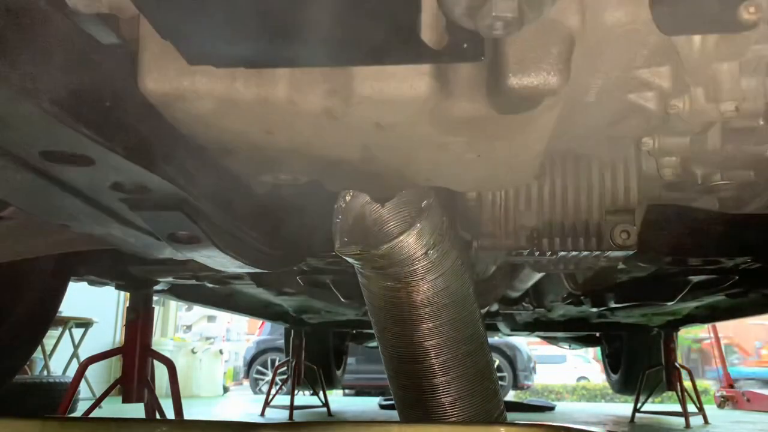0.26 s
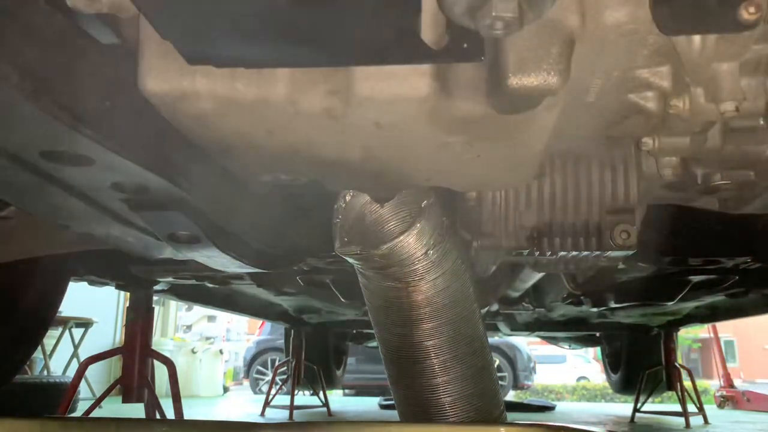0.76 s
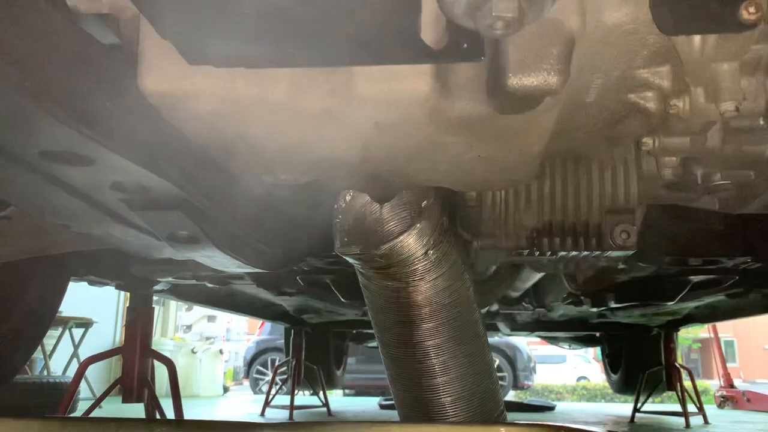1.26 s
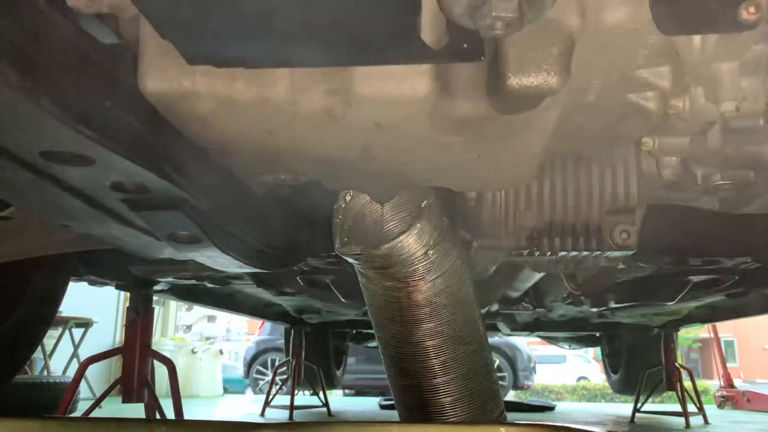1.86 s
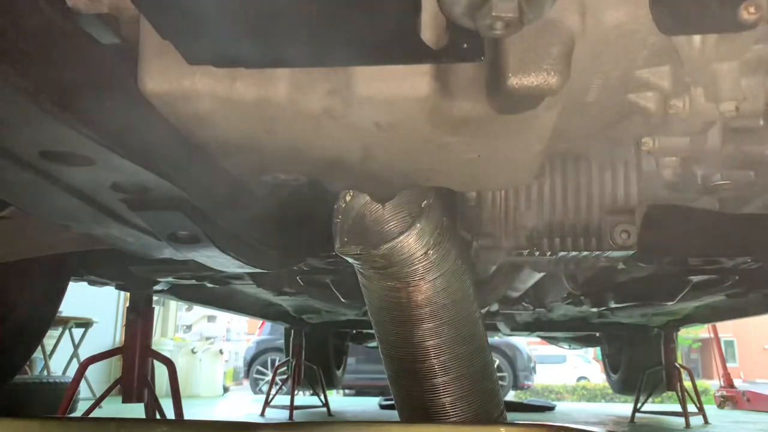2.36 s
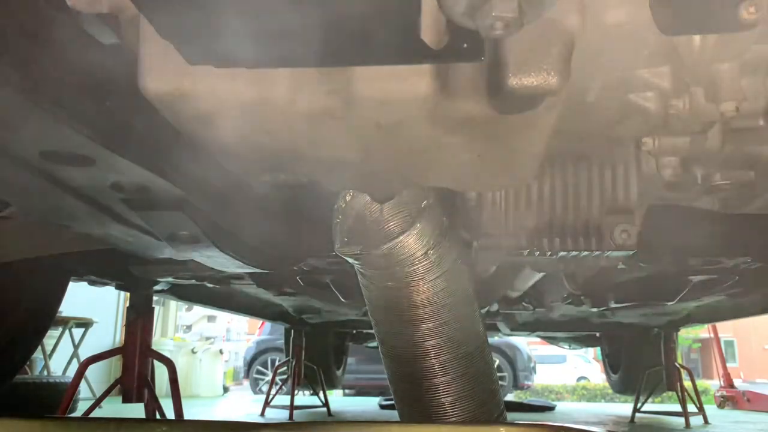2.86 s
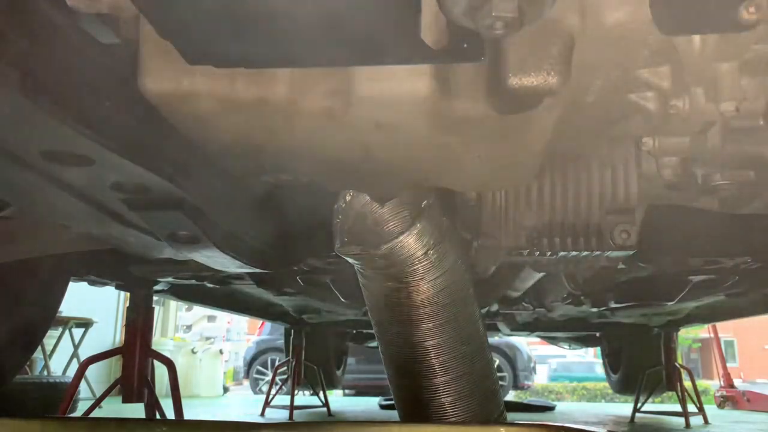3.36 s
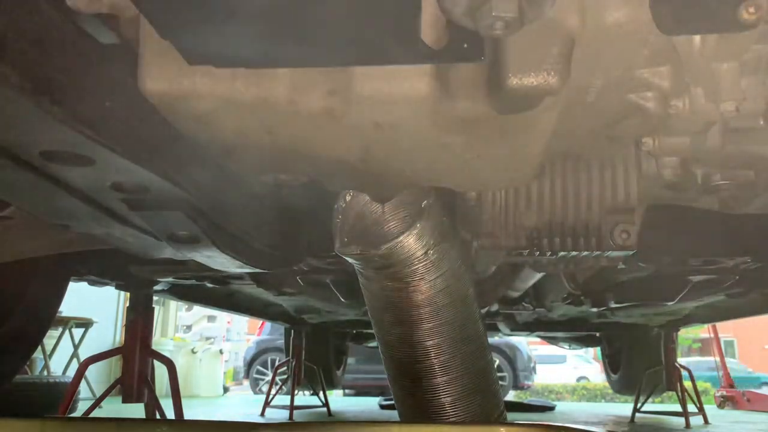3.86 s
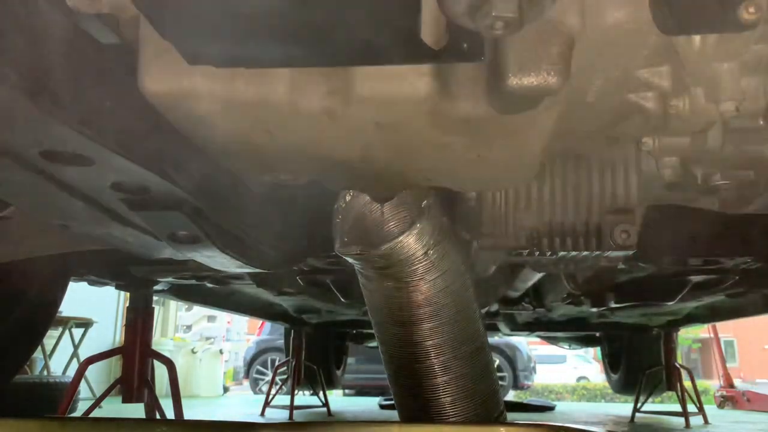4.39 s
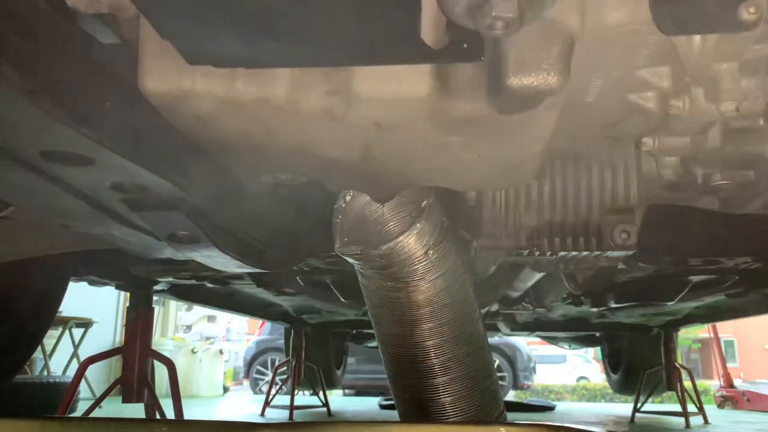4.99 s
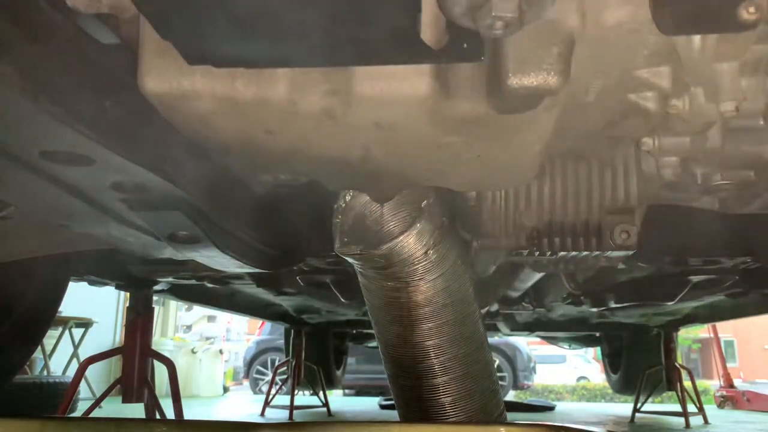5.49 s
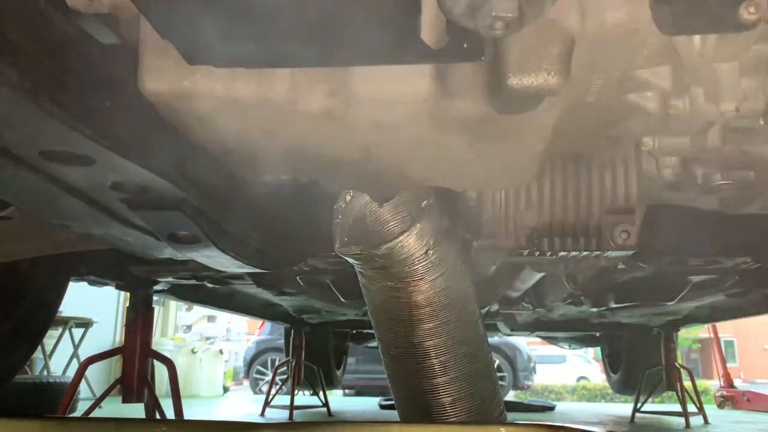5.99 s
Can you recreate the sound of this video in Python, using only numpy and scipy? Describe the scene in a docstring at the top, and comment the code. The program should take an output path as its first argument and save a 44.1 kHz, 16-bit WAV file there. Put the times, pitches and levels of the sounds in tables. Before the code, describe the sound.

Close under a raised car in a workshop, a spray jet hisses without a break, bright and slightly gritty. Its noise rings hollowly between floor and metal underbody. An extraction hose roars softly below, a touch louder at first, then even. A passing car's tyre noise quickly fades in the opening second or two, with faint low drones until about three seconds. Wide stereo phone pickup.

```python
"""On the floor beneath a raised car: a spray jet hisses steadily and an extraction hose roars, close to a phone.
The hollow between floor and underbody rings at many narrow resonances, unequal at the two microphone ports.
From the street come a fading rumble, a car drawing away and faint bass drones.
Noise sources are coloured as spectra and swell by slow random levels; the drones are gliding sines."""
import sys
import numpy as np
from scipy import signal
from scipy.fft import rfft, irfft
from scipy.io import wavfile
from scipy.ndimage import uniform_filter1d

SR = 44100
rng = np.random.default_rng(int(sys.argv[2]) if len(sys.argv) > 2 else 0)


def bounce(signal):
    """Save signal as a 16-bit WAV file at the path given by the first command-line argument."""
    frames = np.transpose(np.atleast_2d(signal))
    limited = np.clip(frames, -1, 1)
    pcm = np.round(limited * 32767).astype(np.int16)
    wavfile.write(sys.argv[1], SR, pcm)


N = 275184  # samples
HZ = np.arange(N // 2 + 1) * SR / N  # frequency of each spectrum bin

# Street rumble, relative colour: f/Hz, level/dB per Hz
STREET_COLOUR = [(15, -47), (25, -30), (40, -2.5), (65, -5), (100, 2.5), (140, 1.5), (160, -3), (175, -10),
                 (230, -50)]
# Extraction hose, relative colour: f/Hz, level/dB per Hz
HOSE_COLOUR = [(60, -58), (150, -28), (174, -14), (186, -2.5), (220, -1), (243, 2), (270, -1.5), (300, -7),
               (345, -7.5), (420, -10), (480, -18), (620, -17.5), (720, -26), (900, -88), (1500, -75)]
# Unshared part of the bass at the two ports: f/Hz, level/dB relative to the shared part
BASS_SIDE = [(30, -29), (100, -17.5), (250, -20), (500, -10.5), (900, 3)]
# Tyres of a car drawing away, relative colour: f/Hz, level/dB per Hz
TYRE_COLOUR = [(300, -14), (600, -4), (900, -5), (1300, -3), (2500, -24), (6000, -50)]
# Sound scattered about the hollow, unrelated at the two ports: f/Hz, relative level/dB per Hz
HOLLOW_SCATTER = [(450, -32), (600, -20.5), (820, -23.5), (1050, -21), (1500, -21.5), (2300, -15.5),
                  (2680, -14), (2810, -24), (2960, -14), (3130, -26), (3380, -25), (3550, -18),
                  (4200, -14.8), (5400, -12.9), (6100, -15), (7000, -13), (8000, -15), (9000, -26),
                  (11000, -45)]
# Resonances of the hollow, led by two rings of the hose near 570 and 642 Hz: f/Hz, full width at half
# amplitude/Hz, relative level/dB, left minus right/dB, phase lead of right/rad
HOLLOW_MODES = [(570, 40, -4, 4.5, -.8), (642, 80, -4.5, -.4, .1), (843, 241, -19.5, 1.3, -3),
                (980, 38, -3, -6.7, -.2), (1006, 36, -7, -6, -.2), (1157, 213, -15.9, 0, -.3),
                (1288, 60, -13, 9.4, -2.2), (1388, 65, -5.2, -2.7, 2), (1541, 47, -17.2, 12, .3),
                (1637, 106, -12.6, 1.8, -.1), (1744, 150, -7.6, -1.8, -1.4), (1905, 120, -7.6, .6, -.6),
                (2086, 74, -11.9, 1.9, -3.1), (2190, 60, -13, -1.5, -.2), (2317, 72, -13.3, 5.3, -2.6),
                (2461, 215, -11.3, .8, -1.6), (2590, 150, -4.2, 1.9, 0), (2695, 110, -5, -2.5, -.5),
                (2942, 95, -4.8, -2.6, -1.5), (3035, 75, -8, .9, -.9), (3319, 249, -15, -.8, -3.1),
                (3583, 140, -8.8, -1.7, -2.4), (3698, 178, -11.3, 2.1, -2.2), (4110, 380, -10, -3.4, -1.8),
                (4570, 300, -8.5, -7.2, -2), (4823, 76, -12.1, -2.7, 3.1), (5100, 260, -9.2, -4.7, -2.1),
                (5672, 420, -8.3, -4.5, -2.7), (6400, 400, -10.5, -3.8, -1.8), (6800, 450, -9, -.5, -2.9),
                (7090, 120, -5, -.6, -2.7)]
# Spray jet before its echoes, relative colour: f/Hz, level/dB per Hz
JET_COLOUR = [(4000, -32), (6200, -18), (7100, -6), (8000, -2.5), (9000, -.1), (10000, -1.3), (11000, -4.2),
              (11700, -4.4), (12500, -5.2), (12900, -9), (13600, -8.8), (14500, -9.7), (16000, -10)]
# Jet echoes off near metal: delay/ms, gain/ratio
METAL_ECHOES = [(0.363, -0.066), (1.2, 0.064), (1.824, 0.25), (2.5, -0.028), (3.3, 0.13), (5.023, 0.044)]
# Street drones: loudest from t/s, f/Hz at that moment, level/dB before waver, swell/s, hold/s, fade/s
STREET_DRONES = [(.7, 97.5, -48, .4, 0.52, 0.32), (1.785, 140.5, -40.5, 0.26, 0.22, 0.54),
                 (2.62, 122.5, -39, .15, .05, .15), (2.8, 44.4, -39, .12, .01, 0.19)]

STREET_DB, STREET_FADE_DB_PER_S = -38.5, 0.83  # traffic draws away
HOSE_DB, HOSE_SURGE_DB, HOSE_SETTLE_S = -32, 3, 0.54  # starts louder, settles to HOSE_DB
TYRES_DB, TYRES_FADE_DB_PER_S = -45.5, 10
HOLLOW_DB, JET_DB = -30.5, -27.5  # steady levels before flutter
NULL_HZ, NULL_WIDTH_HZ, NULL_DEPTH = 2818, 75, .78  # band thinned by the floor bounce; depth 0-1
JET_LAG_MS = .2165  # the left port hears the jet later
JET_SCATTER_DB = -32  # part arriving from all sides, relative to the direct jet
JET_TIE = .65  # wide spray: how firmly its in-step and out-of-step parts hang together, 0-1
DRONE_SAG_PER_S = 0.0296  # share of the listed pitch lost each second
DRONE_RANGE_DB = 10  # rise over one swell time, fall over one fade time
TOP_HZ = 15720  # upper edge of the phone's band


def undb(db):
    """Turn decibels into an amplitude ratio."""
    return 10 ** (np.asarray(db) / 20)


def shape(points):
    """Draw a gain curve through (Hz, dB) points, straight in dB over log frequency."""
    hz, db = np.transpose(points)
    return undb(np.interp(np.log(HZ + 1), np.log(hz), db))


def white():
    """Draw a fresh white-noise spectrum."""
    return rng.standard_normal(len(HZ)) + 1j * rng.standard_normal(len(HZ))


def sound(spectra):
    """Turn left and right spectra into waves with a joint rms of 1."""
    waves = irfft(np.array(spectra), N)
    return waves / np.sqrt(np.mean(waves ** 2))


def walk(rate):
    """Wander slowly: random levels held 1 / rate s, smoothed twice, with a spread near 1."""
    hold = int(SR / rate)
    steps = rng.standard_normal(N)[np.arange(N) // hold]
    smooth = uniform_filter1d(uniform_filter1d(steps, hold), hold)
    return smooth * 4 / 3


def bass(colour, lumpy_db, lumps_per_s):
    """Long waves reach both ports nearly alike and swell unevenly."""
    shared = shape(colour) * white()
    unshared = shape(colour) * shape(BASS_SIDE) * white()
    ports = sound([shared + unshared, shared - unshared])
    return ports * undb(lumpy_db * walk(lumps_per_s))


def street_rumble(t):
    """Distant traffic is low noise that fades as it draws away."""
    level_db = STREET_DB - STREET_FADE_DB_PER_S * t
    return undb(level_db) * bass(STREET_COLOUR, lumpy_db=1.06, lumps_per_s=5)


def hose_roar(t):
    """Air drawn through the hose roars as low noise, a little louder at first."""
    level_db = HOSE_DB + HOSE_SURGE_DB * np.exp(-t / HOSE_SETTLE_S)
    return undb(level_db) * bass(HOSE_COLOUR, lumpy_db=0.64, lumps_per_s=8)


def car_tyres(t):
    """Tyre noise, unrelated at the two ports, fades quickly as the car draws away."""
    level_db = TYRES_DB - TYRES_FADE_DB_PER_S * t
    return undb(level_db) * sound([shape(TYRE_COLOUR) * white() for _ in range(2)])


def workshop(wet_db, decay_ms=5.0):
    """Dense echoes off stands, floor and walls leave a fine fixed ripple in the colour."""
    ms = np.arange(4096) * 1000 / SR
    tail = rng.standard_normal(4096) * np.exp(-ms / decay_ms) * (ms > 4)
    tail = tail / np.sqrt(np.sum(tail ** 2))
    return 1 + undb(wet_db) * rfft(tail, N)


def hollow(flutter_db=0.55, swell_db=0.2):
    """Each resonance has its own turbulent drive and its own standing pattern across the ports."""
    left, right = shape(HOLLOW_SCATTER) * white(), shape(HOLLOW_SCATTER) * white()
    for hz, width, db, pan_db, lead in HOLLOW_MODES:
        skirt = 1 + (2 * (HZ - hz) / width) ** 2  # steep, to keep the valleys dark
        ring = undb(db) * white() / skirt
        left = left + ring * undb(pan_db / 2)
        right = right + ring * undb(-pan_db / 2) * np.exp(1j * lead)
    null = 1 - NULL_DEPTH / (1 + (2 * (HZ - NULL_HZ) / NULL_WIDTH_HZ) ** 2)
    treble = HZ ** 2 / (HZ ** 2 + 2000.0 ** 2)  # short waves scatter most
    colour = null * (1 + treble * (workshop(wet_db=-9.0) - 1))
    level_db = flutter_db * walk(7) + swell_db * walk(3.5)
    return sound([colour * left, colour * right]) * undb(level_db)


def jet(flutter_db=0.14, spit_db=0.63):
    """Spray noise from one side, rippled by short echoes, flutters and spits a little."""
    echoes = [gain * np.exp(-2j * np.pi * HZ * ms / 1000) for ms, gain in METAL_ECHOES]
    colour = shape(JET_COLOUR) * (1 + sum(echoes)) * workshop(wet_db=-12)
    direct = white()
    loose = JET_TIE * direct + np.sqrt(1 - JET_TIE ** 2) * white()
    # The lag puts the ports in step at some pitches and out of step at others
    turn = np.pi * HZ * JET_LAG_MS / 1000  # half the phase lag, rad
    in_step = np.cos(turn) * direct
    out_of_step = -1j * np.sin(turn) * loose
    arrivals = (in_step + out_of_step, in_step - out_of_step)  # left, right
    ports = [colour * (x + undb(JET_SCATTER_DB) * white()) for x in arrivals]
    level_db = flutter_db * walk(3.7) + spit_db * walk(130)
    return sound(ports) * undb(level_db)


def drones(t, waver_db=2.5):
    """Low street tones, the same at both ports, swell, waver, sink a little in pitch and fade."""
    tones = 0
    for peak_s, hz, db, swell, hold, fade in STREET_DRONES:
        before = (peak_s - t) / swell
        after = (t - peak_s - hold) / fade
        away = np.maximum(np.maximum(before, after), 0)  # 0 throughout the hold
        level_db = db - DRONE_RANGE_DB * away + waver_db * walk(8.77)
        pitch = hz * (1 - DRONE_SAG_PER_S * (t - peak_s))
        tone = np.sin(2 * np.pi * np.cumsum(pitch) / SR)
        tones = tones + np.sqrt(2) * undb(level_db) * tone  # root 2 makes the level an rms
    return tones


def scene():
    """Mix the fading street and car, settling hose, steady hollow and jet, and passing drones."""
    t = np.arange(N) / SR
    low = street_rumble(t) + hose_roar(t)
    near = undb(HOLLOW_DB) * hollow() + undb(JET_DB) * jet()
    return low + car_tyres(t) + near + drones(t)


def record(dry):
    """The phone cuts the top with a steep elliptic low-pass."""
    # order 14, 0.2 dB passband ripple, 80 dB stopband
    low_pass = signal.ellip(14, .2, 80, TOP_HZ, fs=SR, output="sos")
    return signal.sosfilt(low_pass, dry)


dry = scene()
out = record(dry)
bounce(out)
```